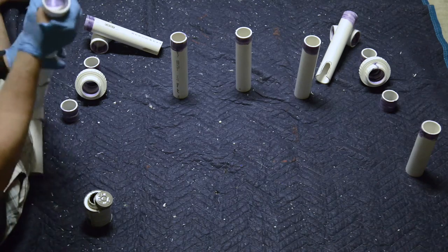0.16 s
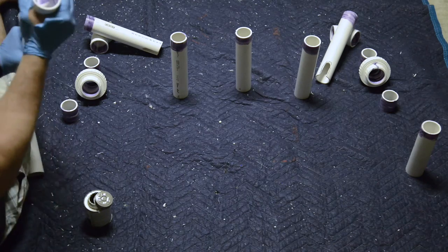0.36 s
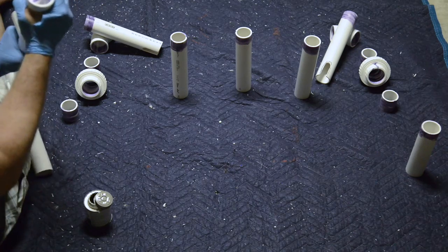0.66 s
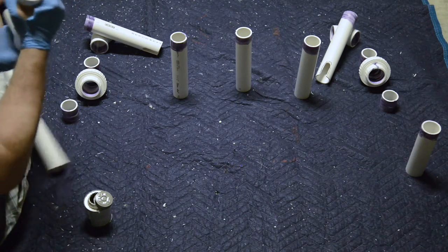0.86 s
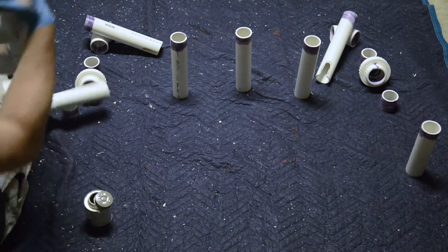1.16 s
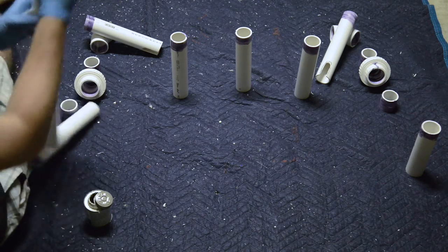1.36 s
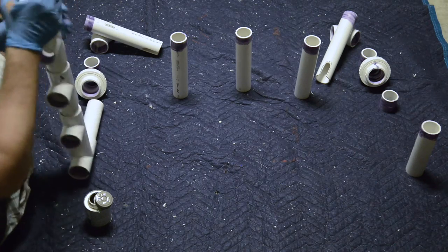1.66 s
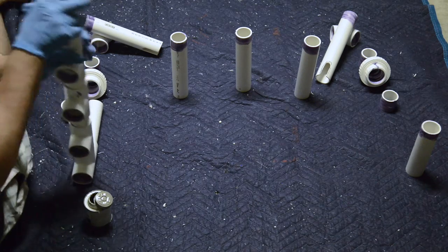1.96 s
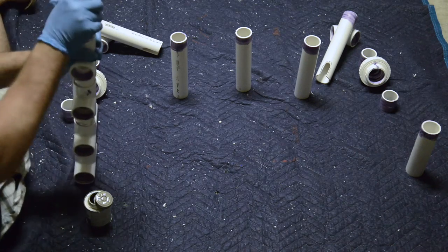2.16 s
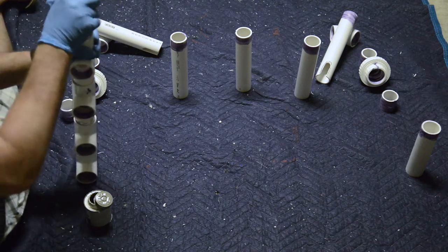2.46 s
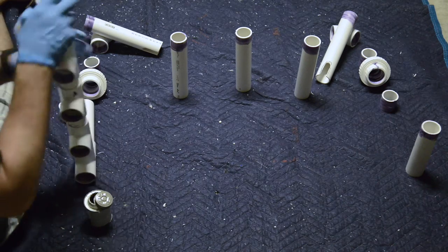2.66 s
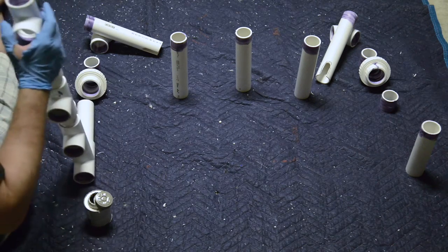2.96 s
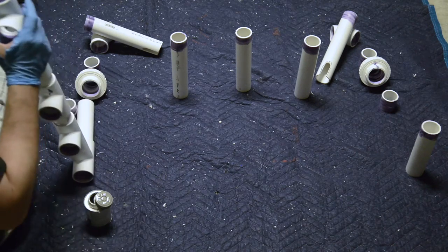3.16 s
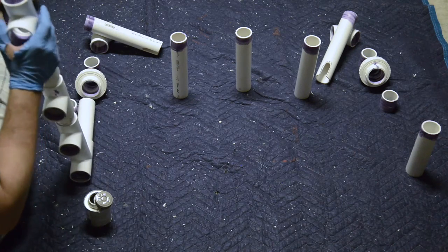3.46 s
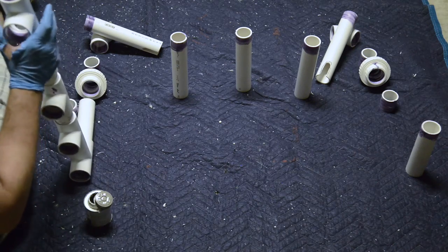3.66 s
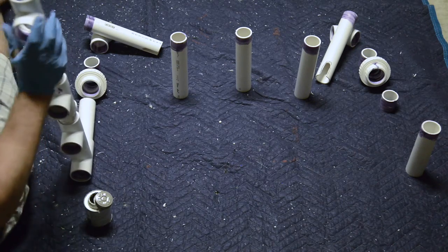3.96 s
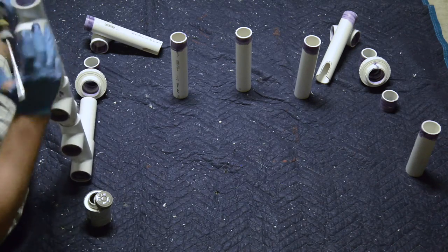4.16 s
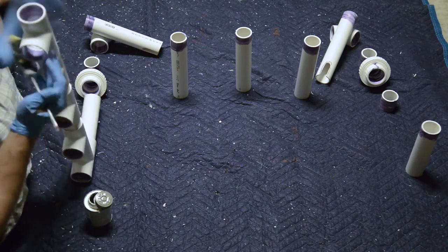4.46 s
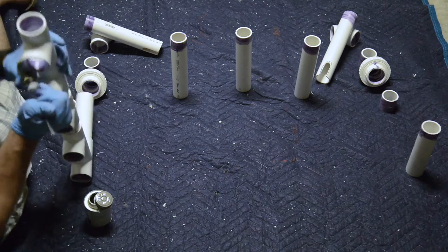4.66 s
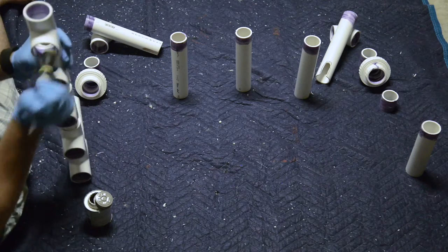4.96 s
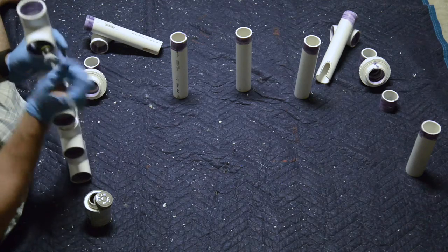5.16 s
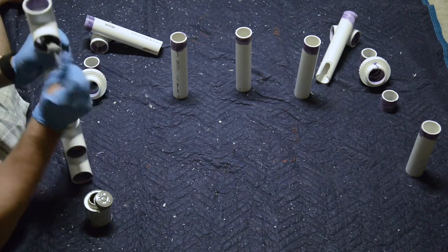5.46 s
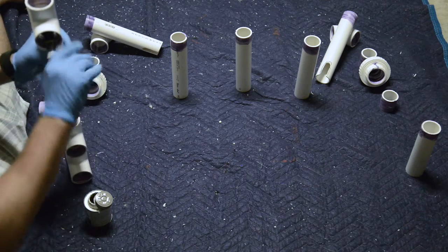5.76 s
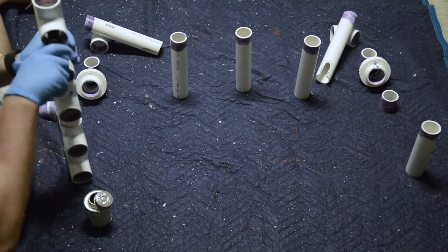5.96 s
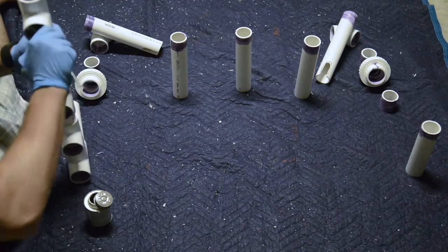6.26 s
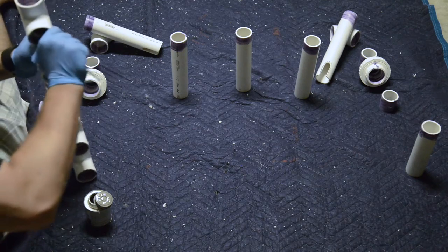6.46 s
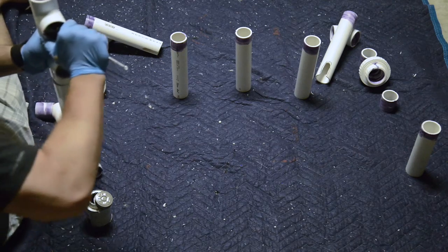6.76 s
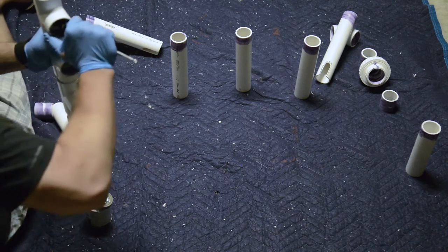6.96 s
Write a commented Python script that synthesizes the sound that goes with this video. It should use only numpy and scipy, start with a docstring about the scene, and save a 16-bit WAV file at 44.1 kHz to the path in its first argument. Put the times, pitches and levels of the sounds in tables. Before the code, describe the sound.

Hollow plastic pipes and fittings are handled close to the microphone in a small hard room. Faint rustling and tiny metallic ticks lead to a sharp clack and a short scrape. After a lull comes a loud cluster of hollow knocks and gritty rubbing, with a pipe ringing briefly. Several separate knocks and scrapes follow, easing off toward the end over a very quiet background.

```python
"""Plastic pipes on a workbench

Gloved hands push, twist and knock hollow plastic pipes and fittings on a padded bench in a small hard
workshop. Impacts excite damped modes of the air columns and walls; stick-slip friction in the joints
drives the same modes and adds a crackling hiss. A small metal part tinkles, edges tick, a free pipe
rings on, and the loudest knock overloads with a low thud. The room answers knocks, tinkles and slides
with a short dense tail."""
import sys
import numpy as np
from scipy import signal
from scipy.fft import rfft, irfft
from scipy.io import wavfile

SR = 44100
rng = np.random.default_rng(int(sys.argv[2]) if len(sys.argv) > 2 else 0)


def wrap_up_sound(samples):
    """Save the sound to the file named by the first command line argument, as 16-bit audio."""
    columns = np.atleast_2d(samples).T
    # keep every value between -1 and 1, then stretch to whole-number steps
    tamed = np.clip(columns, -1, 1)
    steps = np.round(tamed * 32767).astype(np.int16)
    wavfile.write(sys.argv[1], SR, steps)


N = 313061


def from_db(db):
    """Amplitude ratio of a level in decibels."""
    return np.exp(np.asarray(db) * np.log(10) / 20)


def unit_rms(x):
    """Normalisation to an rms of 1."""
    return x / np.sqrt(np.mean(x ** 2) + 1e-20)


def at_hz(points, hz):
    """Interpolation on a logarithmic frequency axis."""
    frequencies, values = np.transpose(points)
    return np.interp(np.log(hz), np.log(frequencies), values)


def butterworth(x, order, hz, kind):
    """Filtering with a maximally flat passband."""
    return signal.sosfilt(signal.butter(order, hz, kind, fs=SR, output="sos"), x)


def coloured_noise(spectrum):
    """Spectral shaping of white noise, at rms 1."""
    hz = np.maximum(np.arange(N // 2 + 1) * SR / N, 1)
    return unit_rms(irfft(rfft(rng.standard_normal(N)) * from_db(at_hz(spectrum, hz)), N))


def wander(rate_hz):
    """Slow random modulation: Gaussian values joined by straight lines."""
    steps = rng.standard_normal(int(N / SR * rate_hz) + 2)
    return np.interp(np.arange(N) * rate_hz / SR, np.arange(len(steps)), steps)


def impulses(start_s, heights):
    """Ideal impacts, each one sample long."""
    out = np.zeros(N)
    out[(start_s * SR).astype(int)] = heights
    return out


def resonator(force, hz, t60_s):
    """Damped harmonic oscillator: a unit impulse starts a decaying sine of height about 1."""
    radius, angle = from_db(-60 / (max(t60_s, .005) * SR)), 2 * np.pi * hz / SR
    return signal.lfilter([0, np.sin(angle)], [1, -2 * radius * np.cos(angle), radius ** 2], force + 1e-18)


def strike(start_s, level_db, pitch_hz, modes, reach_octaves, spread_db, contact_cycles=6):
    """Modal superposition: each blow favours the modes near its pitch, with random strength and sign."""
    mode_hz, mode_db, t60_s = np.transpose(modes)
    detuning = np.log2(mode_hz / pitch_hz[:, None]) / reach_octaves
    share = from_db(mode_db - 9 * detuning ** 2 + spread_db * rng.standard_normal(detuning.shape))
    share *= from_db(level_db)[:, None] / np.sqrt((share ** 2).sum(axis=1, keepdims=True))
    share *= rng.choice([-1, 1], share.shape)
    out = np.zeros(N)
    for k, hz in enumerate(mode_hz):
        # the contact is soft: a mode takes a few cycles to rise
        push = resonator(impulses(start_s, share[:, k]), hz, contact_cycles / hz)
        out += resonator(push, hz, t60_s[k]) * 2 * np.log(1000) * hz / (contact_cycles * SR)
    return out


# Background spectrum of the workshop: frequency_hz, density_db
ROOM_TONE_SPECTRUM = [(15, -60), (25, -32), (70, -29.5), (113, -3), (306, -1), (350, 0.5), (829, -3.5),
                      (1960, -6.5), (4290, -15.5), (6960, -19.5), (11000, -21.5), (15600, -45.5)]

def room_tone(level_db=-69):
    """Stationary noise, strongest in the low middle range."""
    return from_db(level_db) * coloured_noise(ROOM_TONE_SPECTRUM)


# Light handling between strokes: time_s, tube_db, hiss_db
HANDLING = [(0, -68.5, -65), (.5, -63.5, -68.5), (.8, -75.5, -76.5), (1.5, -100, -76.5),
            (1.619, -72.5, -68), (1.84, -62, -63.5), (1.95, -71.5, -73), (2.3, -91, -89.5),
            (2.86, -70, -70), (3.2, -100, -99), (3.28, -69, -68.5), (4.15, -74, -77.5), (4.698, -64, -67.5),
            (5.35, -62, -65), (5.88, -72, -71.5), (6.03, -68, -72.5), (6.55, -66.5, -71),
            (7.1, -75.5, -75.5)]
# Sliding and twisting strokes; glove and cloth tilt the hiss bright, pipe on pipe dull:
# start_s, rise_s, fade_s, air_hz, air_db, wall_hz, wall_db, hiss_db, tilt_db_per_octave
STROKES = [(0.125, 0.01, 0.14, 700, -61, 1600, -58.5, -62.5, 3),
           (0.225, 0.039, 0.48, 520, -60, 1390, -60, -57, 6.5),
           (0.38, 0.0072, 0.16, 850, -71, 1290, -57, -60, -1),
           (0.585, 0.011, 0.37, 600, -63.5, 1560, -59, -59.5, 3.5),
           (0.832, 0.016, 0.22, 686, -61, 1360, -57, -49.5, 8.5),
           (0.859, 0.022, 0.23, 1100, -99, 1340, -45.5, -47.5, -3),
           (0.885, 0.026, 1, 690, -63, 2240, -47.5, -43.5, 2.5),
           (1.10, 0.075, 0.96, 890, -54.5, 1900, -55, -51, 6),
           (1.235, 0.0019, 0.19, 860, -25.5, 1870, -28, -41, 9),
           (1.327, 0.038, 0.19, 480, -34, 2000, -29.5, -32.5, 0),
           (2.434, 0.0054, 0.2, 910, -49.5, 2240, -53.5, -74, 11),
           (2.59, 0.0073, 0.45, 700, -68.5, 1780, -62.5, -59.5, 0.5),
           (3.302, 0.02, 0.24, 900, -62, 1560, -32, -63, 15),
           (3.405, 0.028, 0.21, 700, -57, 1510, -63, -49.5, -2.5),
           (3.498, 0.043, 0.62, 503, -21, 2140, -39.5, -45, -10.5),
           (3.551, 0.0037, 0.35, 694, -36, 2130, -20.5, -31, -7.5),
           (3.588, 0.021, .25, 700, -34.5, 1360, -18, -31, -5),
           (3.723, 0.013, 0.11, 400, -12, 1400, -18.5, -33, -13),
           (3.752, 0.034, 0.4, 730, -15.5, 1350, -18, -24, -6),
           (3.84, 0.039, 0.36, 700, -20, 1560, -24, -31.5, -12.5),
           (3.95, 0.016, .25, 780, -30.5, 1580, -46, -48, -37),
           (4.198, 0.025, 0.26, 630, -52, 1580, -31, -36.5, -5.5),
           (4.24, 0.016, 0.27, 897, -59, 1910, -39, -42.5, 5),
           (4.405, 0.034, 0.27, 896, -57.5, 2420, -53, -48.5, 5.5),
           (4.509, 0.0091, 0.2, 910, -58, 1670, -27.5, -35.5, -4.5),
           (4.705, 0.019, 0.16, 880, -42.5, 1710, -50, -63.5, 4),
           (4.78, 0.039, 0.11, 650, -52, 1720, -48.5, -66.5, 15),
           (4.876, 0.0024, 0.2, 900, -48.5, 1760, -38, -78.5, -6.5),
           (5.004, 0.027, 0.45, 704, -43, 1780, -28.5, -33, -4.5),
           (5.077, 0.03, 0.27, 790, -23, 1660, -18, -28.5, -5),
           (5.391, 0.0093, 0.12, 750, -35.5, 1450, -33, -57, 10),
           (5.422, 0.029, 0.27, 730, -49.5, 1700, -16, -24.5, -4.5),
           (5.596, 0.036, 0.15, 900, -29, 1790, -35, -33.5, -6),
           (5.65, 0.035, 0.12, 670, -30.5, 1654, -57, -58, -11),
           (5.8, 0.032, 0.14, 676, -59, 1700, -65, -75, -3),
           (6.057, 0.02, 0.23, 750, -39, 1860, -28, -46, -2),
           (6.088, 0.028, 0.19, 715, -28.5, 1610, -29, -42, -4),
           (6.205, .015, 0.18, 625, -60, 1545, -68.5, -51, 7),
           (6.393, 0.024, 0.099, 900, -39.5, 1670, -40.5, -65, 2)]

def friction_envelopes(onset_db=-17.5, fade_exponent=1.204, dulling_db_per_octave=7):
    """Incoherent sources add in power; their pitches and hiss tilt are averaged, weighted by power."""
    t = np.arange(N) / SR
    time_s, tube_db, rustle_db = np.transpose(HANDLING)
    power = from_db([2 * np.interp(t, time_s, db) for db in (tube_db, tube_db, rustle_db)])
    colour = power * [[750], [1700], [-1.6]]   # handling: air_hz, wall_hz, tilt_db_per_octave
    fade_speed = np.array([[1], [1], [1.367]])   # the hiss dies sooner than air and wall
    for start_s, rise_s, fade_s, air_hz, air_db, wall_hz, wall_db, hiss_db, tilt in STROKES:
        rise_s = max(rise_s, .002)
        span = slice(int(start_s * SR), int((start_s + rise_s + 2 * fade_s) * SR))
        swell_db = onset_db * np.clip(1 - (t[span] - start_s) / rise_s, 0, 1) ** 2
        age = np.maximum(t[span] - start_s - rise_s, 0) / fade_s
        fade_db = -40 * (fade_speed * age) ** fade_exponent
        stroke_power = from_db(2 * (np.array([[air_db], [wall_db], [hiss_db]]) + swell_db + fade_db))
        power[:, span] += stroke_power
        colour[:, span] += stroke_power * np.broadcast_arrays(
            air_hz, wall_hz, tilt - dulling_db_per_octave * age)
    return np.sqrt(power), colour / power


# Spectrum of friction noise: frequency_hz, density_db
FRICTION_SPECTRUM = [(1470, -34), (2500, -11.5), (3700, -14), (4800, -10), (6130, -12.5), (9410, -13.5),
                     (11300, -20), (15600, -40.5)]

def crackle(snaps_per_s=120, t60_cycles=49):
    """A Poisson process of tiny snaps, each ringing at one treble pitch; rms 1."""
    snaps = (rng.random(N) < snaps_per_s / SR) * from_db(4 * np.minimum(rng.exponential(1, N), 3))
    pitch_index = rng.integers(0, 14, N)
    out = 0
    for k, hz in enumerate(np.geomspace(3500, 12500, 14)):
        ringing = resonator(snaps * (pitch_index == k), hz, t60_cycles / hz)
        out += from_db(at_hz(FRICTION_SPECTRUM, hz)) * ringing
    return unit_rms(out)


def friction_hiss(slips, tilt_db_per_octave):
    """Amplitude-modulated noise: each slip puffs the hiss, and each narrow band flickers on its own."""
    puffs = unit_rms(signal.lfilter([1], [1, -.97], np.abs(slips)))
    snaps = from_db(-6) * crackle()
    noises = [unit_rms((puffs + 2) * coloured_noise(FRICTION_SPECTRUM)) + snaps for _ in range(2)]
    out, edges_hz = 0, 2000 * 2. ** np.arange(0, 3.01, .125)
    for k, (low, high) in enumerate(zip(edges_hz, edges_hz[1:])):
        band = butterworth(noises[k % 2], 2, [low, high], "band")
        flicker_db = 2.4 * wander(25) + 3.5 * wander(6)
        out += band * from_db(flicker_db + tilt_db_per_octave * np.log2(low / 5000))
    return out


def chatter(slips, modes, pitch_hz, selectivity_db, cutoff_hz):
    """Forced vibration: each mode comes and goes as the contact moves; soft slips excite little treble."""
    out, power = 0, 1e-12
    for k, (hz, mode_db, t60_s) in enumerate(modes):
        share = from_db(mode_db - selectivity_db * np.log2(hz / pitch_hz) ** 2 + 3 * wander(18))
        out += share * unit_rms(resonator(slips[k % 2], hz, t60_s))
        power += share ** 2
    return butterworth(out / np.sqrt(power), 4, cutoff_hz, "low")


# Standing waves of the air columns: frequency_hz, level_db, t60_s
AIR_MODES = [(295, -4.5, 0.025), (368, 8, 0.033), (480, -8, 0.015), (593.7, -10, 0.063),
             (675.6, -3.5, 0.073), (730, -4.5, 0.02), (821.2, 1, 0.033), (967, -1.5, 0.044),
             (1003, -0.5, 0.058), (1100, 8.5, 0.018)]
# Bending modes of the tube walls: frequency_hz, level_db, t60_s
WALL_MODES = [(1243, 2.5, 0.036), (1310, 6, 0.014), (1363, 2.5, 0.024), (1542, 5, 0.019),
              (1678, -1.5, 0.061), (1760, -0.5, 0.036), (1887, 6, 0.011), (2084, 3, 0.019),
              (2240, 3.5, 0.012), (2420, 0, 0.025), (2644, 3.5, 0.016), (2920, -4, 0.032),
              (3330, -3, 0.019)]

def slides(slips_per_s=1500):
    """Stick-slip friction: random impulses of uneven size drive air column, walls and hiss."""
    (air_gain, wall_gain, hiss_gain), (air_hz, wall_hz, tilt) = friction_envelopes()
    slipping = rng.random((2, N)) < slips_per_s / SR
    slips = slipping * from_db(3.03 * np.minimum(rng.exponential(1, (2, N)), 4))
    slips *= rng.choice([-1, 1], (2, N))
    air = chatter(slips, AIR_MODES, air_hz, selectivity_db=13, cutoff_hz=2530)
    wall = chatter(slips, WALL_MODES, wall_hz, selectivity_db=27.7, cutoff_hz=4140)
    return air_gain * air + wall_gain * wall + hiss_gain * friction_hiss(slips[0], tilt)


# Modes of the small metal part: frequency_hz, level_db, t60_s
METAL_MODES = [(3730, 0.5, 0.0069), (4100, -4.5, 0.033), (4620, -2, 0.018), (5080, -5, 0.02),
               (5600, -11.5, 0.043), (6100, 4.5, 0.012), (6430, 4.5, 0.0086), (7000, -11, 0.039),
               (7830, 9, 0.0044), (8820, 33, 0.012), (10800, 14, 0.0075), (12200, 8.5, 0.0047)]
# Light touches on it: start_s, level_db, pitch_hz
TINKLES = [(0.135, -45, 6140), (0.238, -43, 6960), (0.2685, -49, 8600), (0.305, -54, 7100),
           (0.4299, -53, 5200), (0.838, -44.5, 6440), (2.5346, -52, 6900), (2.601, -47.5, 6940),
           (2.604, -43, 3660), (3.3051, -32.5, 4100), (3.31, -45.5, 5470), (3.307, -44.5, 8800),
           (3.309, -46.5, 11500), (4.8773, -53, 4620), (5.0385, -30, 4830), (5.3945, -43.5, 4030),
           (6.0736, -40.5, 5000), (6.1064, -34.5, 5130)]

def tinkles():
    """Impact excitation: light touches ring the high, short-lived modes of a small metal part."""
    start_s, level_db, pitch_hz = np.transpose(TINKLES)
    return strike(start_s, level_db - 3, pitch_hz, METAL_MODES, reach_octaves=.15, spread_db=2.5)


# Blows on the tubes: start_s, level_db, air_hz, wall_hz, wall_over_air_db, crack_over_air_db
KNOCKS = [(0.431, -52, 970, 1280, 12, 18), (0.882, -53, 1140, 1250, 24.5, 3),
          (1.026, -38.5, 636, 2000, -3, -8), (1.2355, -20, 620, 1700, -12, 16),
          (1.359, -30, 1020, 1540, 6.5, -10), (2.434, -41.5, 900, 2300, 6, -13),
          (3.255, -24.5, 353, 2330, -39, -22), (3.305, -38, 1170, 1400, 27, 13),
          (3.307, -46.5, 1100, 3010, 27, -15), (3.32, -41.5, 1100, 1440, 22.5, -4),
          (3.508, -13, 355, 1233, -21.5, -17), (3.553, -25, 720, 2500, 9.5, 0),
          (3.608, -11, 706, 1520, -10, -13), (3.734, -5, 1080, 1320, 0, -20),
          (3.771, -5.5, 713, 1310, -6.5, -20), (3.803, -3, 700, 1430, 0, -28.5),
          (3.8535, -0.5, 1030, 1137, -11, -7), (3.863, -12, 756, 1240, 1.5, -19),
          (3.876, -0.5, 700, 1200, -58.5, -30.5), (3.91, -9.5, 700, 1552, 1, -22),
          (4.198, -33, 634, 1650, -18, 12.5), (4.211, -17.5, 792, 1700, -4.5, -9),
          (4.512, -13, 930, 1670, -0.5, 1.5), (4.531, -23, 830, 1720, 2.5, -9),
          (4.708, -29.5, 850, 1920, -11, -9), (4.79, -28.5, 590, 1170, -24.5, -35),
          (4.875, -27, 875, 1784, 9.5, -41), (5.017, -37, 1090, 1640, 6.5, 7),
          (5.036, -9.5, 900, 1830, -1, -51), (5.109, -5, 694, 1665, 1, -16),
          (5.396, -15, 760, 1176, 1.5, -39), (5.447, -3.5, 758, 1790, -6, -21),
          (5.643, -26, 980, 1660, 8.5, -17), (6.064, -19.5, 740, 1900, -14, -1.5),
          (6.073, -21, 900, 1930, 2, -19), (6.107, -18.5, 595, 1460, 8.5, -28),
          (6.396, -35.5, 903, 1790, 10, -2), (6.418, -30, 858, 1630, 1.5, -34)]

def knocks(crack_t60_s=0.0052):
    """Impulse response of a tube: air column and wall modes ring after a brief crack at the contact."""
    start_s, level_db, air_hz, wall_hz, wall_over_air_db, crack_over_air_db = np.transpose(KNOCKS)
    air_db = level_db - 2.5
    air = strike(start_s, air_db, air_hz, AIR_MODES, reach_octaves=.27, spread_db=2.2)
    wall = strike(start_s, air_db + wall_over_air_db, wall_hz, WALL_MODES, reach_octaves=.26, spread_db=2.2)
    contacts = impulses(start_s, from_db(level_db + crack_over_air_db - 5))
    decay = signal.lfilter([1], [1, -from_db(-60 / (crack_t60_s * SR))], contacts + 1e-18)
    burst = decay * coloured_noise(FRICTION_SPECTRUM)
    crack = signal.lfilter([.25], [1, -1, .25], burst)   # duller than the hiss
    return air + wall + crack


# Edge striking edge: start_s, level_db, pitch_hz
TICKS = [(0.935, -29, 4000), (1.018, -32, 11000), (1.047, -32, 5490), (1.112, -33, 8000),
         (1.153, -30, 12000), (1.21, -38, 12500), (1.2356, -24, 2500), (1.237, -16, 5800),
         (3.554, -17, 7000), (3.724, -27, 7000), (3.735, -4.5, 1355), (3.853, -1, 1100), (3.855, -15, 8500),
         (3.924, -20, 8000), (4.33, -27, 2900), (4.81, -35, 4650), (4.876, -20, 2690), (5.427, -34, 8000),
         (5.599, -24, 5900)]

def ticks(t60_cycles=22):
    """Heavily damped transients: each sine rises in half a cycle and rings for a few more."""
    out = np.zeros(N)
    t = np.arange(SR // 100) / SR
    for start_s, level_db, hz in TICKS:
        envelope = (1 - np.exp(-2 * hz * t)) * from_db(level_db - 60 * t * hz / t60_cycles)
        out[int(start_s * SR):][:len(t)] += envelope * np.sin(2 * np.pi * hz * t)
    return out


# Modes of a pipe that hangs free: frequency_hz, level_db, t60_s
FREE_PIPE_MODES = [(670, 0, 0.23), (718, 0.5, 0.39), (845, 0, 0.6), (1510, 1, 0.35), (1640, -2, 0.25),
                   (1743, -3, 0.2), (2290, 0, 0.07)]
# Blows on the free pipe: start_s, level_db, pitch_hz
FREE_PIPE_BLOWS = [(2.455, -40, 2290), (3.306, -30, 1510), (3.605, -20, 697), (3.805, -10.5, 699),
                   (3.876, -15.5, 703), (3.912, -27.5, 845), (4.215, -34, 1690), (4.512, -28, 1685),
                   (4.8775, -27.5, 1610), (5.109, -22, 1630), (5.11, -15.5, 670), (5.45, -20, 679),
                   (5.45, -22.5, 1660), (6.108, -27, 681)]

def free_pipe_rings():
    """Free vibration: with little damping, a struck pipe sings on at one or two modes."""
    start_s, level_db, pitch_hz = np.transpose(FREE_PIPE_BLOWS)
    return strike(start_s, level_db, pitch_hz, FREE_PIPE_MODES, reach_octaves=.06, spread_db=1)


# Low thud under the loudest knock: start_s, level_db
LOW_THUMPS = [(3.852, -37.5)]

def low_thump():
    """Overload: a heavily damped sine stands for the short low thud as the loudest knock clips."""
    start_s, level_db = np.transpose(LOW_THUMPS)
    return resonator(impulses(start_s, from_db(level_db + 7.5)), hz=170, t60_s=0.015)


# Decay time of the room tail: frequency_hz, t60_s
REVERB_TIMES = [(200, 0.069), (700, 0.25), (2000, 0.25), (5000, 0.28), (12000, 0.21)]

def reverberation(x, delay_s=0.0021, build_s=0.007, decay_exponent=1.28):
    """Convolution: a short dense room tail builds up, then is cut ever faster, as by a noise suppressor."""
    t = np.arange(SR // 2) / SR
    tail, edges_hz = 0, 80 * 2. ** np.arange(0, 8, .5)
    for low, high in zip(edges_hz, edges_hz[1:]):
        band = butterworth(rng.standard_normal(len(t)), 2, [low, high], "band")
        t60_s = at_hz(REVERB_TIMES, np.sqrt(low * high))
        tail += band * from_db(-60 * (t / t60_s) ** decay_exponent)
    tail *= np.clip((t - delay_s) / build_s, 0, 1)
    return signal.fftconvolve(x, tail / np.sqrt(np.sum(tail ** 2)))[:N]


def scene():
    """Superposition of direct sound, reverberation and room tone in one channel."""
    sources = [knocks(), tinkles(), slides(), ticks() + free_pipe_rings()]
    # narrow tubes radiate little bass
    blows, metal, rubbing, ticks_and_rings = butterworth(sources, 4, 494, "high")
    direct = blows + metal + rubbing + ticks_and_rings
    reflected = reverberation(blows + from_db(-2) * metal + from_db(-16.5) * rubbing)
    return (direct + reflected + low_thump() + room_tone())[None]


def record(dry, stopband_hz=15850):
    """Hard clipping at full scale, then band limiting by a steep low-pass filter."""
    clipped = np.clip(dry, -1, 1)
    return signal.sosfilt(signal.cheby2(20, 60, stopband_hz, fs=SR, output="sos"), clipped)


dry = scene()
out = record(dry)
wrap_up_sound(out)
```